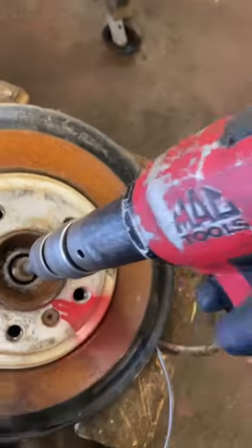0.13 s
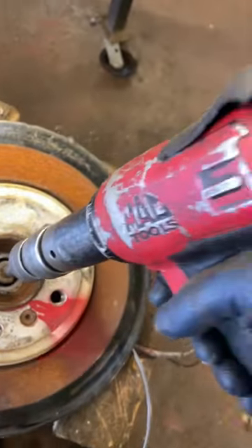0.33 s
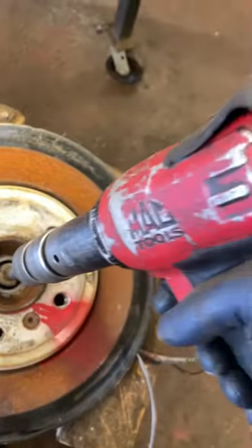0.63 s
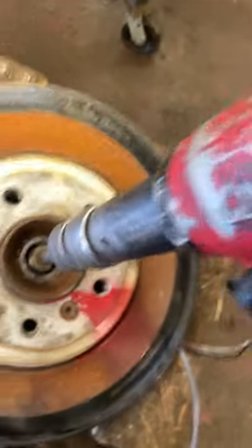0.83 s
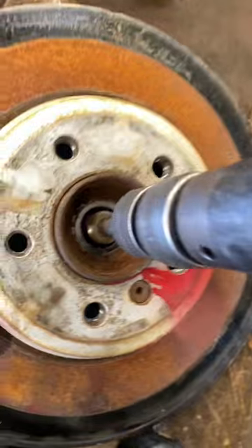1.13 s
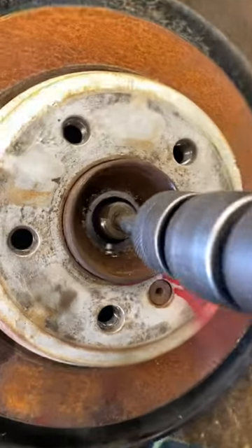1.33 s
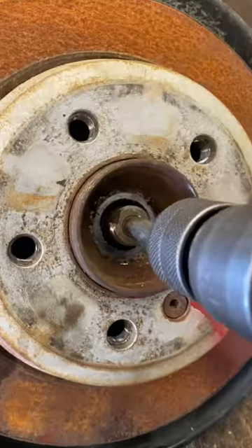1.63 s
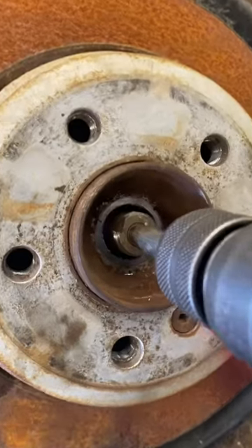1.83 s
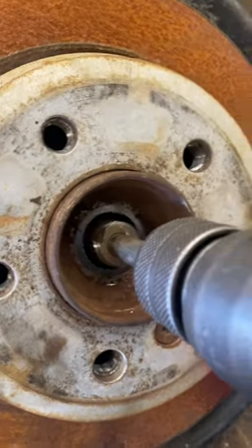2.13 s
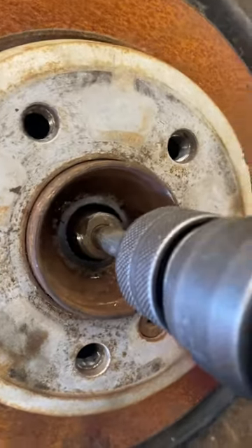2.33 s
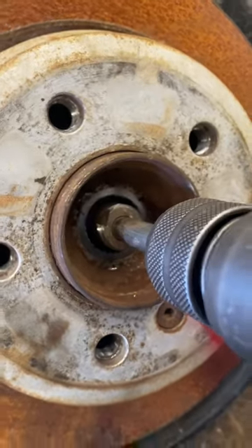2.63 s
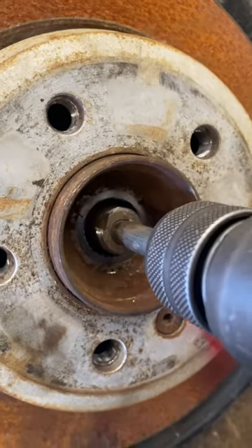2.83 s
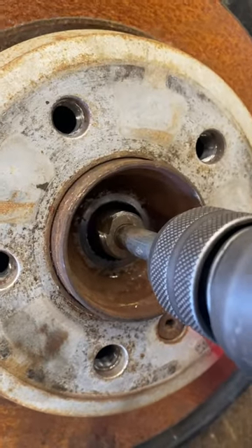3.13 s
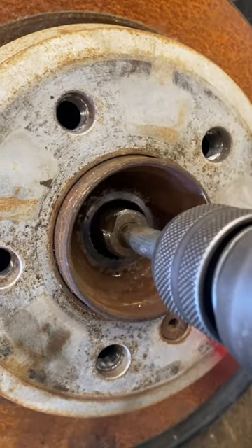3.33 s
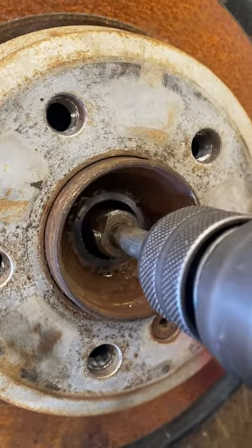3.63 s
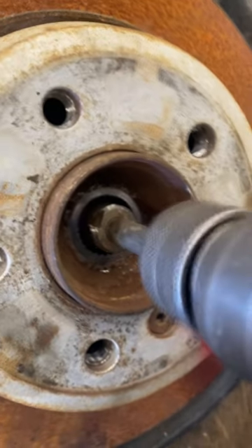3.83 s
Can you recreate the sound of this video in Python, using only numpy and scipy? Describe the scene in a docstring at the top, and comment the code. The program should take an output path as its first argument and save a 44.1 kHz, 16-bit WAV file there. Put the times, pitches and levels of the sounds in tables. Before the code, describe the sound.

A pneumatic hammer pounds steel in a short fierce burst following seconds of low hum and soft rustles

```python
"""In a workshop, an air hammer is set on a steel axle in a brake hub, close to a two-port microphone.
At first a machine rumbles and hums, while glove, hose and chisel rub softly as grainy noise.
Then the valve clacks and the hammer fires: each stroke lets out a puff of air (gated noise), rings the
steel (fading sine waves struck by noise), shakes the bench, and is heard with a thud-like falling tone."""
import sys
import numpy as np
from scipy import signal
from scipy.fft import rfft, irfft, next_fast_len
from scipy.io import wavfile
from scipy.ndimage import uniform_filter1d

SR = 44100
rng = np.random.default_rng(int(sys.argv[2]) if len(sys.argv) > 2 else 0)


def persist_wave(psi):
    """Save psi, clipped to +-1, as 16-bit WAV."""
    counts = np.round(np.clip(psi, -1, 1) * 32767).astype(np.int16)
    wavfile.write(sys.argv[1], SR, np.atleast_2d(counts).T)


N = 176400  # 4 s
TIME = np.arange(N) / SR  # seconds


def amp(db):
    """Turns decibels into a plain multiplier."""
    return 10 ** (np.asarray(db) / 20)


def evened(x):
    """Scales a sound to an average (RMS) strength of 1."""
    return x / np.sqrt(np.mean(x ** 2) + 1e-20)


def read(points, hz):
    """Reads a table between its points, with pitch spaced as the ear hears it (logarithmic)."""
    f, value = np.transpose(points)
    return np.interp(np.log(hz + 1), np.log(f + 1), value)


def shaped(x, gain):
    """Makes each frequency louder or softer by gain(hz), along the last axis."""
    size = next_fast_len(x.shape[-1] + 4096)
    spectrum = rfft(x, size) * gain(np.fft.rfftfreq(size, 1 / SR))
    return irfft(spectrum, size)[..., :x.shape[-1]]


def coloured(noise, table):
    """Gives noise the tone colour of a table, at strength 1."""
    return evened(shaped(noise, lambda hz: amp(read(table, hz))))


def slow_wander(shape, size):
    """Random drift: noise averaged twice over size samples."""
    once = uniform_filter1d(rng.standard_normal(shape), size=size)
    return uniform_filter1d(once, size=size)


def resonance(hz, centre, width):
    """A narrow peak around one frequency."""
    return 1 / (1 + (2 * (hz - centre) / width) ** 2)


def pair(x, same):
    """Mixes two unrelated channels until left and right are as alike as the table says."""
    alike = lambda hz: np.clip(read(same, hz), 0, 1)
    right = shaped(x[0], alike) + shaped(x[1], lambda hz: np.sqrt(1 - alike(hz) ** 2))
    return np.array([x[0], right])


def modes(table, glide=0.):
    """Ring of a struck thing: fading sine waves, energy 1; pitch may rise by a share per second."""
    t = np.arange(8000) / SR
    ring = 0
    for hz, db, t60 in table:
        ring = ring + amp(db - 60 * t / t60) * np.sin(2 * np.pi * hz * t * (1 + glide * t / 2))
    return ring[None] / np.linalg.norm(ring)


def closing(since, snap_s=0.0018):
    """Falls smoothly from 1 to 0 around since = 0, like a closing port."""
    return 1 / (1 + np.exp(np.clip(since / snap_s, -40, 40)))


# Piston strokes and rebounds; levels are relative within each layer:
# (time [s], ring level [dB], puff level [dB], thud level [dB], port open [s])
STROKES = [(3.6045, -34, -34, -12, 0.005), (3.6277, -6.5, -18, -7, 0.007), (3.6363, -15, -29, -9.5, 0.016),
           (3.6508, -10, -9.5, -7, 0.011), (3.6633, -12, -13.5, -12, 0.0063), (3.682, 0, -11.5, -11, 0.019),
           (3.7093, -5, -14.5, -5.5, 0.021), (3.736, -9, -14.5, -21.5, 0.02),
           (3.7422, -8, -35, -20.5, 0.005), (3.7616, 0, -12.5, -12, 0.018), (3.7684, -5, -35, -9.5, 0.005),
           (3.7866, -5, -12.5, -10.5, 0.021), (3.812, -3.5, -13, -11.5, 0.015),
           (3.8184, -11, -26, -19.5, 0.0036), (3.8362, -0.5, -20, -17.5, 0.031),
           (3.8622, -8.5, -15.5, -13.5, 0.018), (3.8874, -3.5, -15.5, -10, 0.017),
           (3.912, -1, -15, -15, 0.015), (3.936, 0, -20.5, -12, 0.023), (3.958, -7.5, -15, -16, 0.018),
           (3.9846, -15, -13.5, -11.5, 0.016)]
LEAD_S = 0.00046  # each stroke begins this long before its listed time


def strokes():
    """Hands out each piston stroke, with the time since it began (0 before)."""
    for s, ring_db, puff_db, thud_db, open_s in STROKES:
        yield s, np.maximum(TIME - s + LEAD_S, 0), ring_db, puff_db, thud_db, open_s


# Tone of the escaping air: (frequency [Hz], level per Hz [dB])
EXHAUST_TONE = [(150, -11), (500, -2), (1000, -12), (2000, -8.5), (3500, -11.5), (5000, -14.5), (6800, -10),
                (9000, -12), (10500, -16), (12500, -12.5), (14500, -24), (16000, -12)]
PUFF_DB, OPEN_S, SAG_DB_PER_S = 2, 0.00022, -450


def exhaust():
    """Air bursts out as noise when the port opens, weakens, and stops as the port closes."""
    gate = np.zeros(N)
    for _, u, _, puff_db, _, open_s in strokes():
        opening = 1 - np.exp(-u / OPEN_S)
        gate += opening * amp(puff_db + SAG_DB_PER_S * u) * closing(u - open_s)
    return amp(PUFF_DB) * gate * coloured(rng.standard_normal((2, N)), EXHAUST_TONE)


# Ringing notes of the struck steel: (frequency [Hz], level [dB], time to fade by 60 dB [s])
STEEL_MODES = [(500, -6, .04), (594, -4, .06), (780, -6, .03), (1016, -12, .04), (1705, -6, .04),
               (2042, -5, .05), (2243, -9, .06), (2492, -10, .06), (3330, -12, .04), (3800, -10, .045),
               (4850, -14, .035), (5200, -15, .04), (5520, -13, .03)]
RING_DB, CHATTER_S, CRACK = -9, 0.0049, 2.05  # CRACK: strength of the single sharp hit


def steel():
    """A sharp hit and a brief noisy chatter set the steel ringing at its own notes."""
    chatter, cracks = np.zeros((2, N))
    for s, u, ring_db, _, _, _ in strokes():
        chatter += (u > 0) * amp(ring_db) * np.exp(-u / CHATTER_S)
        cracks[round(s * SR)] = CRACK * amp(ring_db)
    blows = chatter * rng.standard_normal((2, N)) + cracks
    return signal.oaconvolve(blows, amp(RING_DB) * modes(STEEL_MODES), axes=1)[:, :N]


# Tone of bench and hub shaking under the blows: (frequency [Hz], level per Hz [dB])
SHAKE_TONE = [(15, -42), (25, 3), (70, -6), (124, -31), (160, -4.5), (432, -7), (525, -74), (591, -18),
              (900, -6), (1170, -61), (1980, -120)]
SHAKE_DB, SHAKE_RISE_S, SHAKE_T60_S = -6.5, 0.0014, 0.076


def shake():
    """Bench and hub shake under each blow: low noise that swells fast and dies away."""
    push = np.zeros(N)
    for _, u, _, _, thud_db, _ in strokes():
        push += (1 - np.exp(-u / SHAKE_RISE_S)) * amp(thud_db - 60 * u / SHAKE_T60_S)
    tone = lambda hz: amp(read(SHAKE_TONE, hz)) / (1 + (hz / 900) ** 6)  # dulled above 900 Hz
    return amp(SHAKE_DB) * push * evened(shaped(rng.standard_normal((2, N)), tone))


# Ringing notes of the bench: (frequency [Hz], level [dB], time to fade by 60 dB [s])
BENCH_MODES = [(79.5, 3.5, 0.29), (162.3, 4, 0.24), (320, -13, 0.05), (414, -6, 0.093), (597, -1, 0.32),
               (820, -17, 0.11)]
BENCH_DB, TONE_LAG_S = 14, 0.00078
TONE_TURNS, TONE_START_S, TONE_RISE_S, TONE_T60_S = 1.32, 0.0012, 0.0002, 0.15


def falling_tone_and_bench():
    """With each blow, as the microphone picks it up, a tone of falling pitch is heard; the bench rings."""
    tones, knocks = np.zeros((2, N))
    for s, u, _, _, thud_db, _ in strokes():
        v = np.maximum(u - TONE_LAG_S, 0)
        turns = TONE_TURNS * np.log(1 + v / TONE_START_S)  # pitch = TONE_TURNS / (v + TONE_START_S)
        loudness = (1 - np.exp(-v / TONE_RISE_S)) * amp(thud_db - 60 * v / TONE_T60_S)
        tones += loudness * np.sin(2 * np.pi * turns)
        knocks[round(s * SR)] = amp(thud_db)
    return tones + amp(BENCH_DB) * signal.oaconvolve(knocks, modes(BENCH_MODES)[0])[:N]


# Ringing notes of the valve: (frequency [Hz], level [dB], time to fade by 60 dB [s])
VALVE_MODES = [(500, 2, 0.025), (1030, 1, 0.045), (2050, 2, 0.15), (2606, -5, 0.035), (3750, -5, .12),
               (5350, -14, 0.04), (5800, -16, .1)]
TRIGGER_S, TRIGGER_DB, TRIGGER_RISE_S, DAMPED_S = 3.604, 12, 0.007, 3.623
RATTLE, VALVE_GLIDE_PER_S = 0.095, 1.4  # noise strength beside the click; share the pitch rises by
LEAK_DB, LEAK_HZ, LEAK_ENDS_S = -19, 5600, 3.637


def trigger():
    """The valve clacks open with a short ring, stopped as the piston moves; leaking air hisses thinly."""
    u, noise = TIME - TRIGGER_S, rng.standard_normal((2, 2, N))
    swell = lambda fall: np.exp(-np.where(u < 0, -u / TRIGGER_RISE_S, u / fall))
    click = np.arange(N) == round(TRIGGER_S * SR)
    clack = RATTLE * swell(0.0013) * noise[0] + click
    ring = signal.oaconvolve(clack, modes(VALVE_MODES, VALVE_GLIDE_PER_S), axes=1)[:, :N]
    # the leak has the exhaust's tone with the lows removed
    thin = lambda hz: amp(read(EXHAUST_TONE, hz)) / (1 + (LEAK_HZ / (hz + 1)) ** 6)
    leak = swell(0.1) * evened(shaped(noise[1], thin)) * closing(TIME - LEAK_ENDS_S)
    return amp(TRIGGER_DB) * ring * closing(TIME - DAMPED_S) + amp(LEAK_DB) * leak


# How long the workshop echoes: (frequency [Hz], time to fade by 60 dB [s])
SHOP_FADE = [(100, 0.35), (1000, 1), (4000, 0.42), (12000, 0.067)]


def shop(x):
    """Echo of the workshop: a tail of noise in which each band dies at its own speed."""
    hz, t, bands = signal.stft(rng.standard_normal((2, SR // 2)), SR, nperseg=256)
    fade = amp(-60 * t / read(SHOP_FADE, hz)[:, None])
    tail = signal.istft(bands * fade, SR, nperseg=256)[1]
    return signal.fftconvolve(x[None], tail / np.linalg.norm(tail[0]), axes=1)[:, :N]


# Soft rubs: (start [s], level [dB], rise [s], fall [dB per s], low-mid share [dB],
# low-mid centre [Hz], steel ring level [dB])
RUSTLES = [(0.0, -44, 0.018, -300, -0.5, 1480, -68), (0.534, -38, 0.042, -67, 4.5, 740, -41),
           (.785, -43, 0.033, -70, 4.5, 1300, -46), (1.279, -50.5, 0.016, -105, -0.5, 1209, -59),
           (1.55, -52, 0.02, -47, -19, 900, -70), (1.95, -52.5, 0.039, -58, -11, 1500, -66.5),
           (2.33, -62, 0.021, -40, 19, 790, -73), (3.07, -52, 0.032, -97, 3.5, 1970, -68)]
# Tone of the rubbing hiss: (frequency [Hz], level per Hz [dB])
RUSTLE_TONE = [(300, -28), (600, -32), (1000, -18), (2000, -6.5), (2800, -4.5), (3500, -16.5), (5000, -6.5),
               (6000, -15.5), (7000, -4.5), (9000, -16.5), (10000, -18.5), (12000, -22), (14500, -21),
               (16000, -45)]
# Notes of rubbed steel: (frequency [Hz], width [Hz], level [dB])
SCRAPED_STEEL = [(675, 35, 14), (1010, 50, 1), (1520, 50, -1), (1690, 40, -4), (2290, 60, 0),
                 (2850, 60, -4), (4300, 40, -3), (4700, 24, 11), (5000, 50, -1), (5300, 45, 5),
                 (9050, 110, -8), (10000, 60, 1), (10350, 60, -5), (10700, 50, -3), (11700, 90, -4)]
WANDER_DB, RING_LAG_S, HOLD_S = 4, 0.02, 0.049
TICK_S, TICK_DB, TICK_FADE_S = 1.193, -37.5, 0.00054


def rustles():
    """Glove, hose and chisel rub: grainy hiss, a low-mid hump, wavering steel notes, and one small tick."""
    noise = rng.standard_normal((3, 2, N))
    noise *= amp(0.5 * evened(uniform_filter1d(rng.standard_normal(N), 300)))  # grain
    hiss = coloured(noise[0], RUSTLE_TONE)
    whistle = 0
    for (f, width, db), slow in zip(SCRAPED_STEEL, slow_wander((len(SCRAPED_STEEL), N), 2500)):
        note = shaped(noise[2], lambda hz: resonance(hz, f, width))
        whistle = whistle + amp(db + WANDER_DB * evened(slow)) * note
    whistle = evened(whistle)
    out = np.zeros((2, N))
    for s, db, rise, fall_db, body_db, body_hz, whistle_db in RUSTLES:
        part = slice(max(round(s * SR), 0), round((s + 0.9) * SR))
        u = np.maximum(TIME[part] - s, 0)
        hump = lambda hz: np.exp(-(np.log(hz / body_hz + 1e-9) / 0.61) ** 2)
        body = evened(shaped(noise[1][:, part], hump))
        swell = np.sin(np.pi / 2 * np.minimum(u / rise, 1)) ** 2
        shape = swell * amp(fall_db * np.maximum(u - rise - HOLD_S, 0))
        late = np.minimum(u / (rise + RING_LAG_S), 1)  # body and steel build up later than the hiss
        rub = amp(db) * (hiss[:, part] + amp(body_db) * late * body)
        out[:, part] += shape * (rub + amp(whistle_db) * late * whistle[:, part])
    tick = np.exp(-abs(TIME - TICK_S) / TICK_FADE_S) * (TIME > TICK_S)
    bright_noise = np.diff(rng.standard_normal((2, N + 1)))
    return out + amp(TICK_DB) * tick * bright_noise


# Tone of the shop floor: (frequency [Hz], level per Hz [dB])
FLOOR_TONE = [(20, -32), (49, 2), (62, 6.5), (81, -5), (150, 3.5), (198, -3), (262, -3), (400, -14),
              (513, -15.5), (950, -27.5), (2500, -34), (5200, -41), (6800, -47), (8600, -52.5),
              (12000, -49.5), (14000, -53.5), (16000, -58)]
# Low rumble: (time [s], level [dB])
RUMBLE_LEVEL = [(0, -31), (.8, -30), (1.5, -32), (2.2, -33), (2.8, -31), (3.6, -33)]
# Air noise above the rumble: (time [s], level [dB])
AIR_LEVEL = [(0, -45), (.5, -41.5), (1.3, -41.5), (2.4, -43), (3.6, -42.5)]


def shop_floor():
    """Low machine rumble under a thin wash of air noise, split near 380 Hz so each has its own level."""
    noise = rng.standard_normal((2, 2, N))
    low = lambda hz: 1 / (1 + (hz / 380) ** 6)
    rumble = evened(shaped(noise[0], lambda hz: amp(read(FLOOR_TONE, hz)) * low(hz)))
    air = evened(shaped(noise[1], lambda hz: amp(read(FLOOR_TONE, hz)) * (1 - low(hz))))
    rumble_gain = amp(np.interp(TIME, *np.transpose(RUMBLE_LEVEL)))
    air_gain = amp(np.interp(TIME, *np.transpose(AIR_LEVEL)))
    return rumble * rumble_gain + air * air_gain


# Machine hum: (time [s], frequency [Hz], level [dB])
HUM = [(0, 260.5, -30.5), (.8, 260.9, -32), (1.5, 260.2, -35), (2.3, 261.8, -39.5), (3.6, 261.8, -37.5)]
HUM_WAVER_DB, WHINE_HZ, WHINE_WIDTH_HZ, WHINE_DB = 1, 2338, 30, -61.5


def hum_and_whine():
    """A gently wavering sine hum, and a faint whine made of a narrow band of noise."""
    s, hz, db = np.transpose(HUM)
    waver = amp(HUM_WAVER_DB * evened(slow_wander(N, 2000)))
    turns = np.cumsum(np.interp(TIME, s, hz)) / SR
    hum = np.sqrt(2) * waver * amp(np.interp(TIME, s, db)) * np.sin(2 * np.pi * turns)
    narrow = shaped(rng.standard_normal((2, N)), lambda f: resonance(f, WHINE_HZ, WHINE_WIDTH_HZ))
    return hum + amp(WHINE_DB) * evened(narrow)


# Likeness of left and right for the near hammer: (frequency [Hz], likeness [0 to 1])
SAME_NEAR = [(60, .97), (500, .87), (1000, .65), (2000, .65), (5000, .45), (6200, .8), (6900, .99),
             (7800, .99), (9000, .8), (10000, .99), (10900, .99), (12000, .8), (13000, .99), (14400, .99),
             (16000, .85)]
# The same for rustles and shop floor: (frequency [Hz], likeness [0 to 1])
SAME_FAR = [(60, .99), (300, .95), (700, .55), (1500, .55), (3500, .45), (5000, .5), (6200, .8),
            (6900, .998), (7900, .998), (9000, .8), (10000, .998), (11000, .998), (12000, .8),
            (12900, .998), (14600, .998), (16000, .85)]
SHOP_DB, THUD_RIGHT_DB = -13.5, 1.5


def scene():
    """Adds the near hammer with its echo, the rustles and the background."""
    thuds = falling_tone_and_bench()
    gun = exhaust() + steel() + shake() + trigger()
    near = pair(gun + amp(SHOP_DB) * shop(gun[0] + thuds), SAME_NEAR)
    near += thuds * amp([[0], [THUD_RIGHT_DB]])  # these enter the right side a little louder
    return near + pair(rustles() + shop_floor(), SAME_FAR) + hum_and_whine()


# How far the left port leads the right: (frequency [Hz], phase lead [radians])
PORT_PHASE = [(0, 0), (1500, .1), (2800, 1.3), (5000, .8), (6000, 1.7), (6900, 3.05), (7800, 3.25),
              (9000, 4.9), (10000, 6.2), (10900, 6.4), (11800, 7.6), (12900, 9.3), (14500, 9.6),
              (15600, 12.6)]
# Left port's level above the right: (frequency [Hz], left minus right [dB])
PORT_TILT = [(60, 1), (180, -1), (550, -3), (1650, 0.5), (4970, -1), (15000, -1)]
EDGE_HZ = 15830


def record(dry):
    """The two ports differ in phase and level; loud peaks round off; then the top treble is cut."""
    def port(hz):
        half_phase = 0.5j * np.interp(hz, *np.transpose(PORT_PHASE))
        return amp(read(PORT_TILT, hz) / 2) * np.exp(half_phase)

    both = np.array([shaped(dry[0], port), shaped(dry[1], lambda hz: 1 / port(hz))])
    both = 0.94 * np.tanh(both / 0.96)
    treble_cut = signal.firwin(1023, EDGE_HZ, window=("kaiser", 9), fs=SR)
    return signal.oaconvolve(both, treble_cut[None], "same")


dry = scene()
out = record(dry)
persist_wave(out)
```